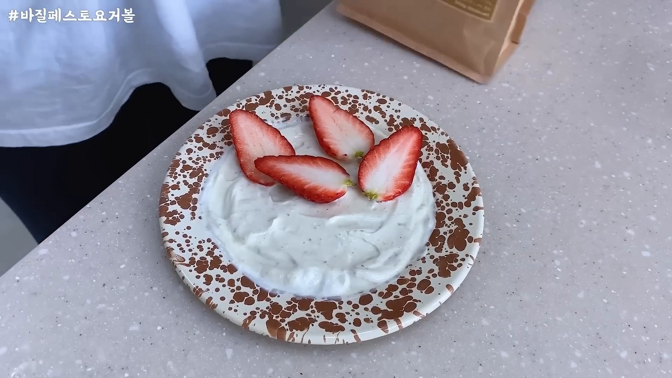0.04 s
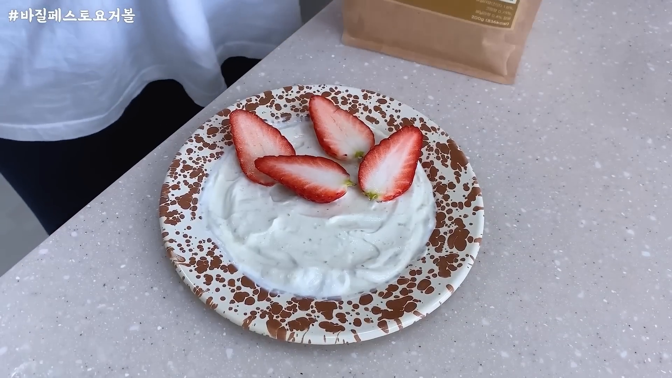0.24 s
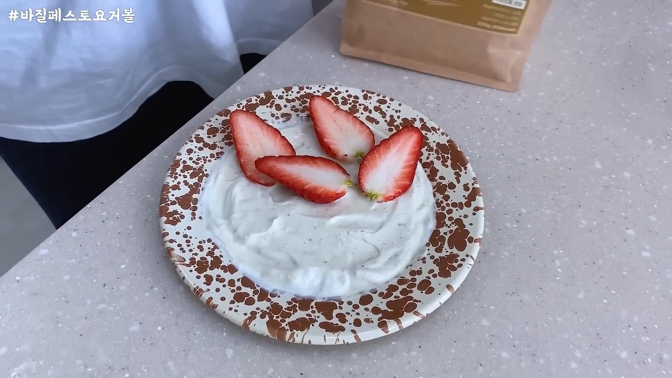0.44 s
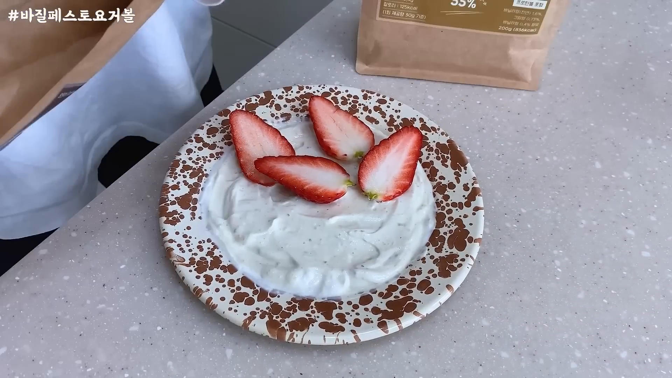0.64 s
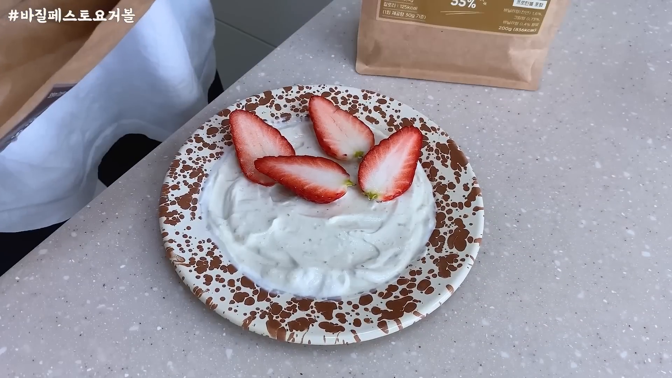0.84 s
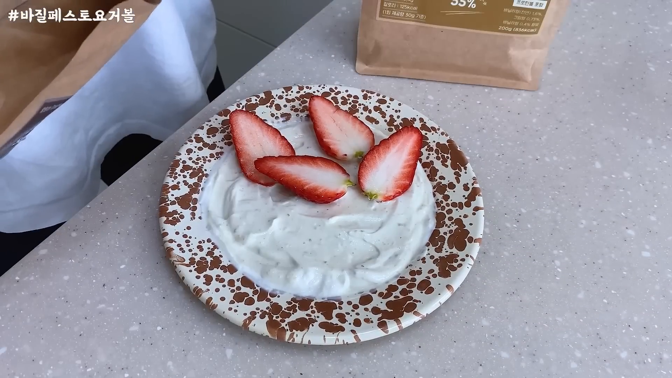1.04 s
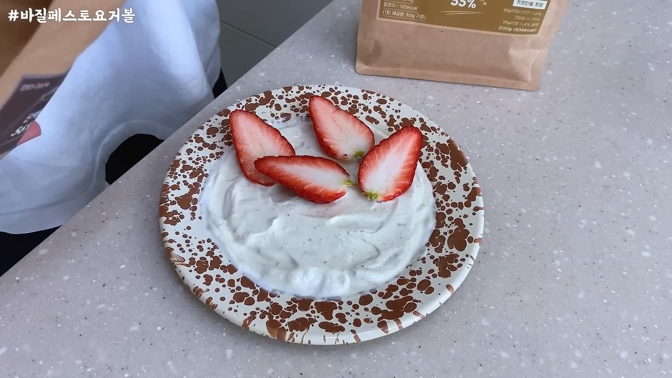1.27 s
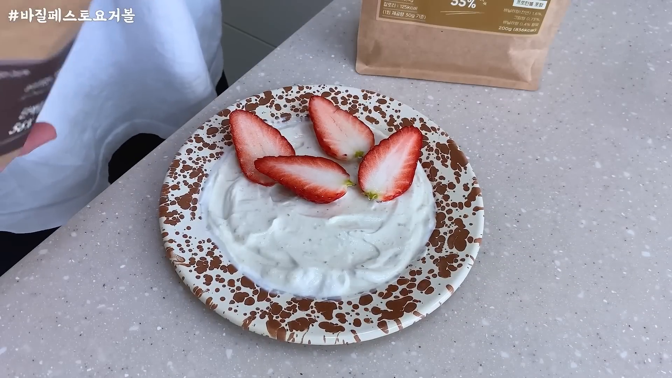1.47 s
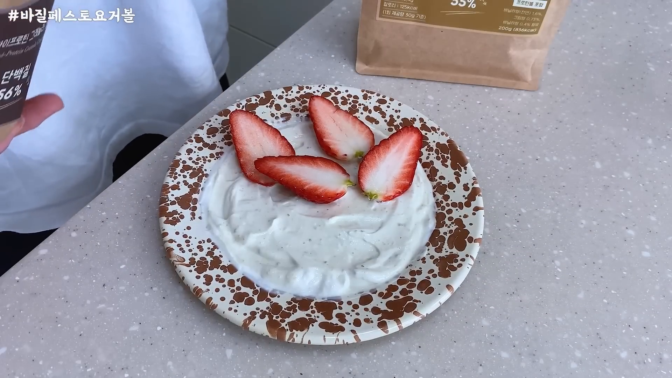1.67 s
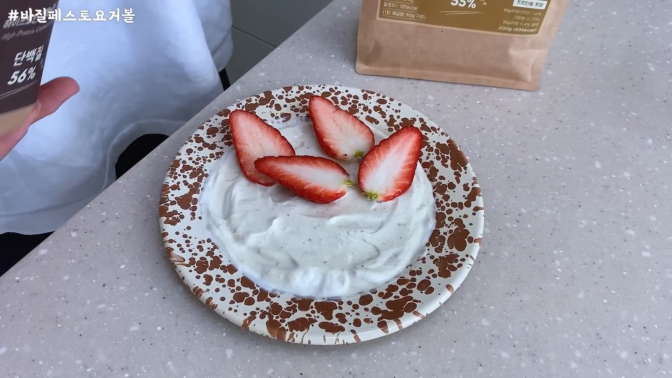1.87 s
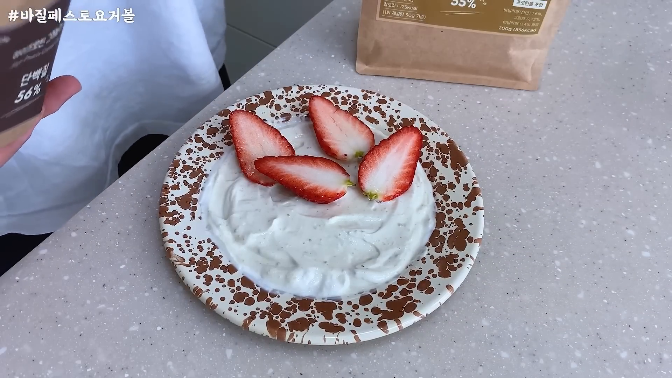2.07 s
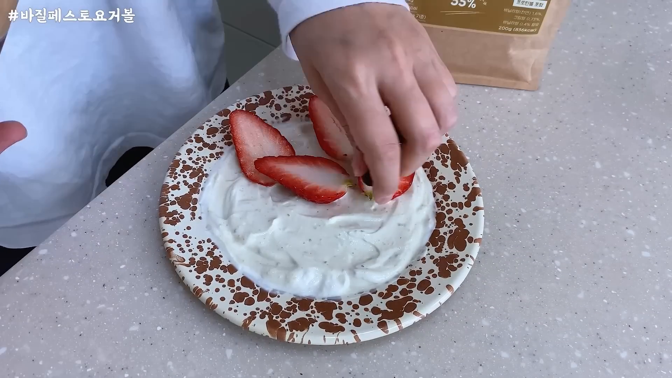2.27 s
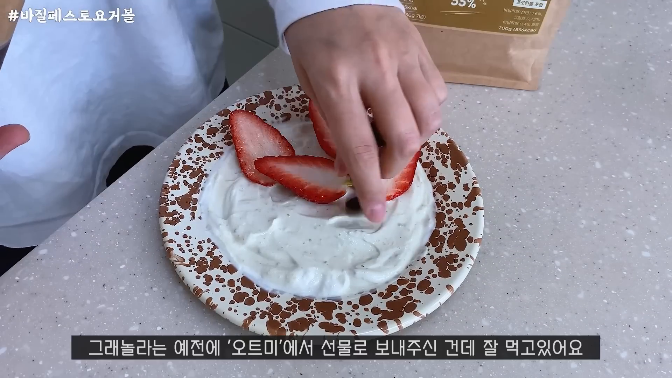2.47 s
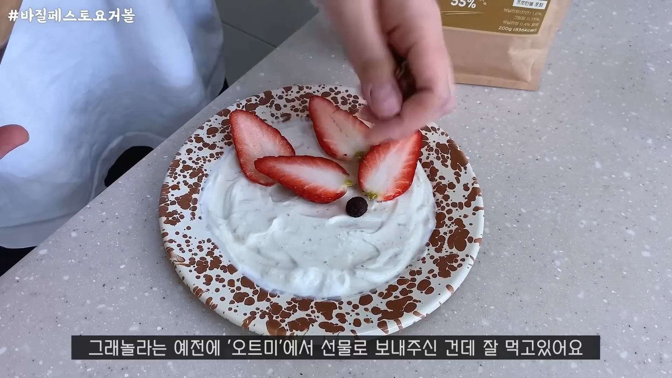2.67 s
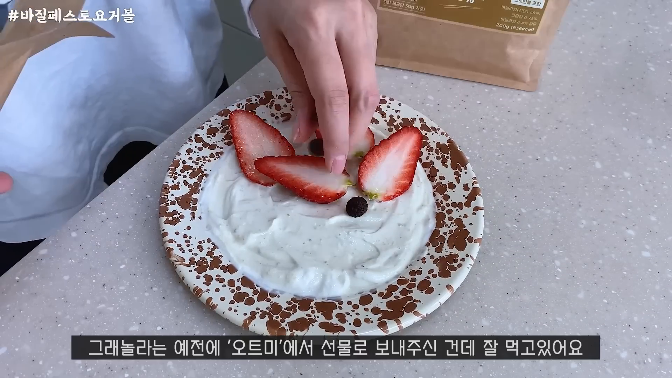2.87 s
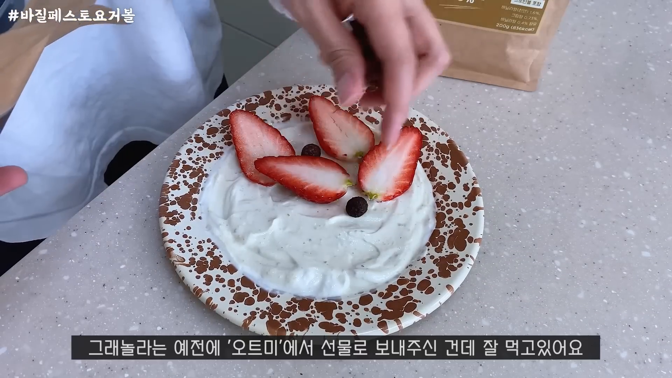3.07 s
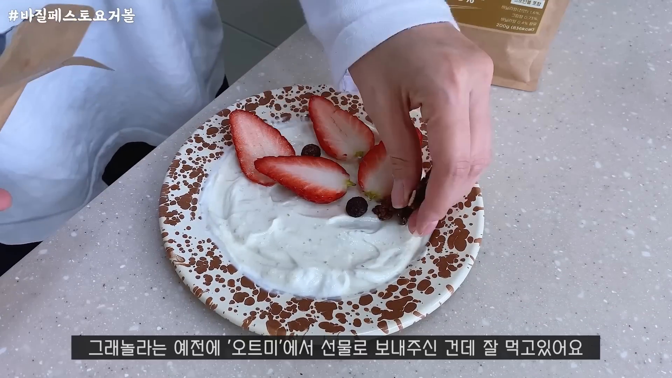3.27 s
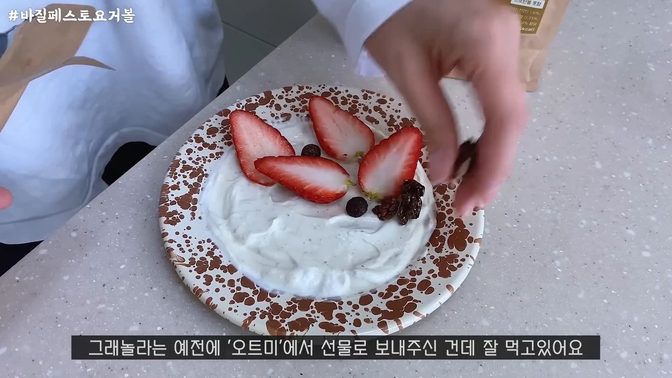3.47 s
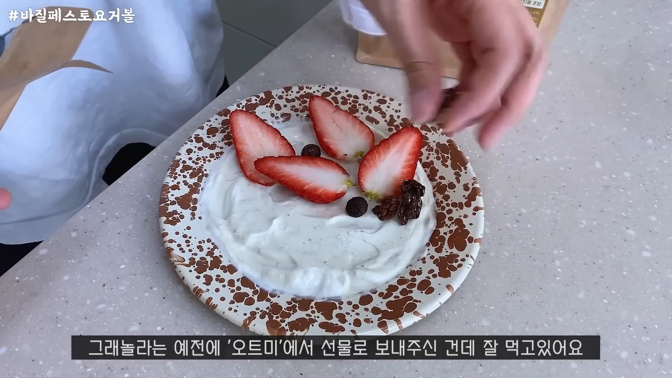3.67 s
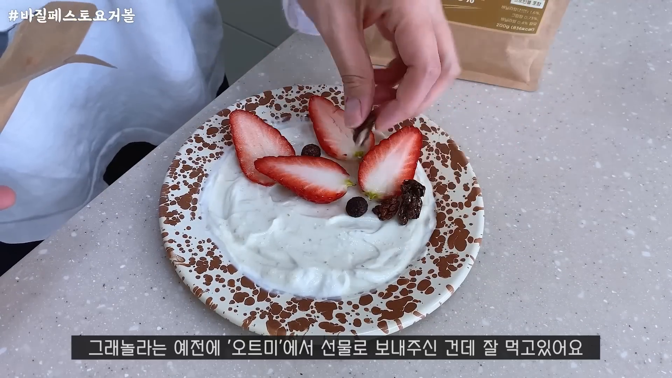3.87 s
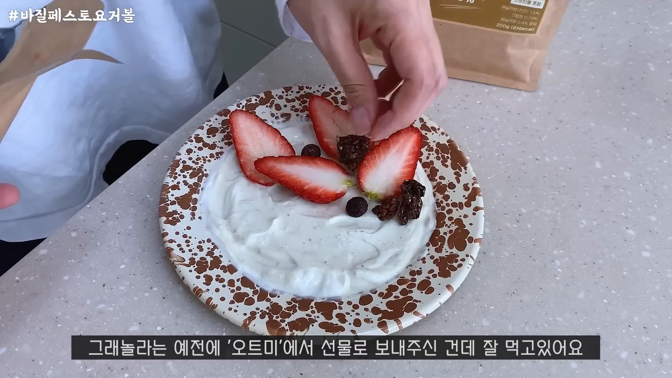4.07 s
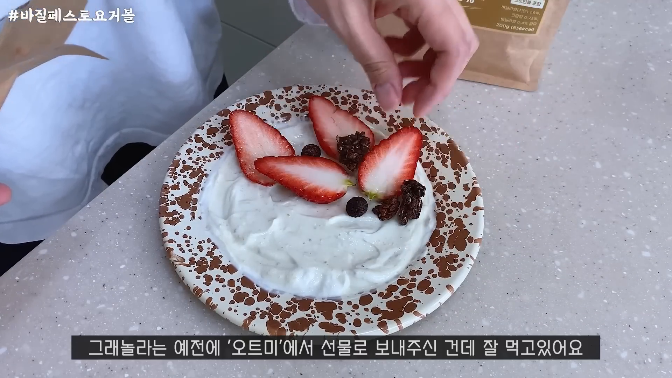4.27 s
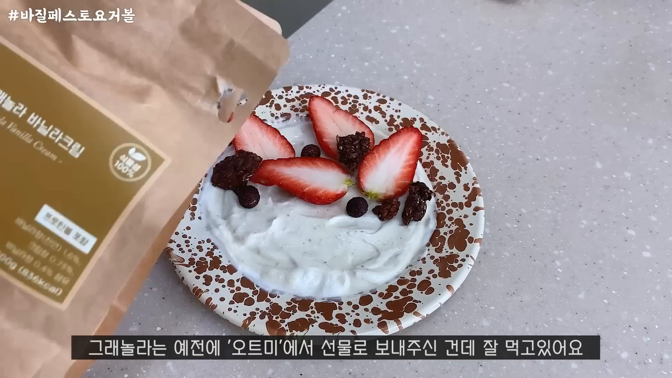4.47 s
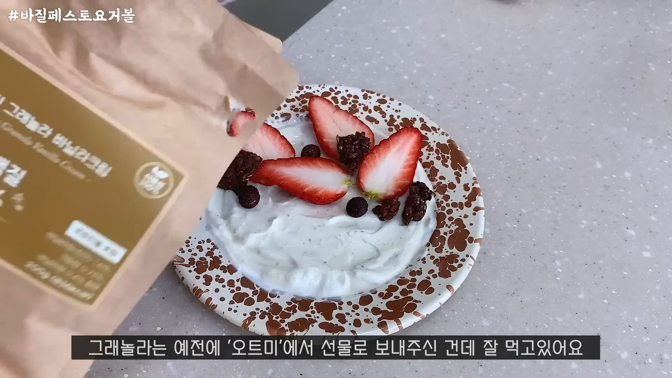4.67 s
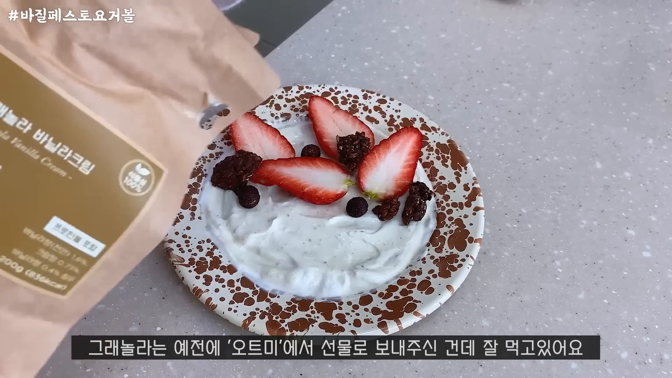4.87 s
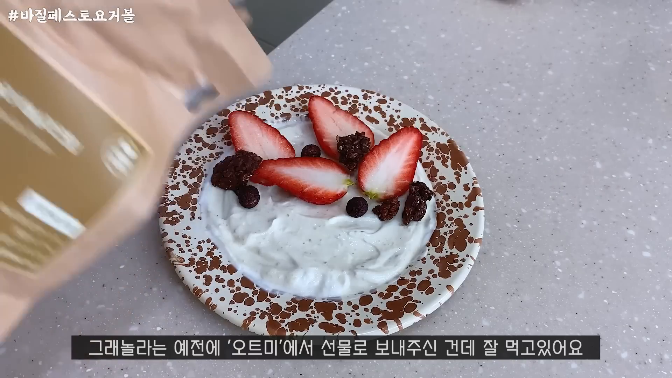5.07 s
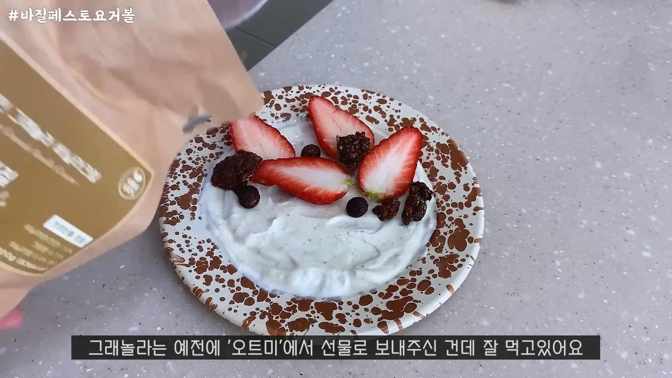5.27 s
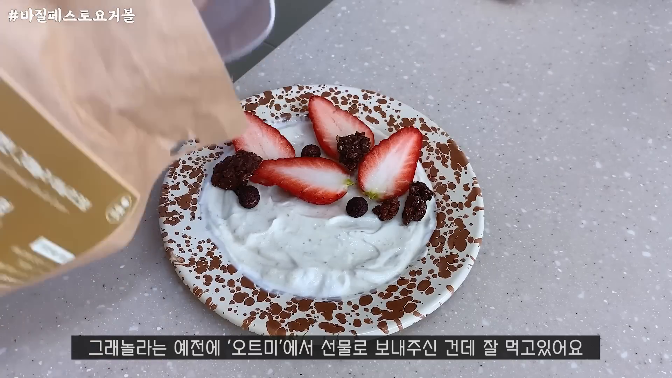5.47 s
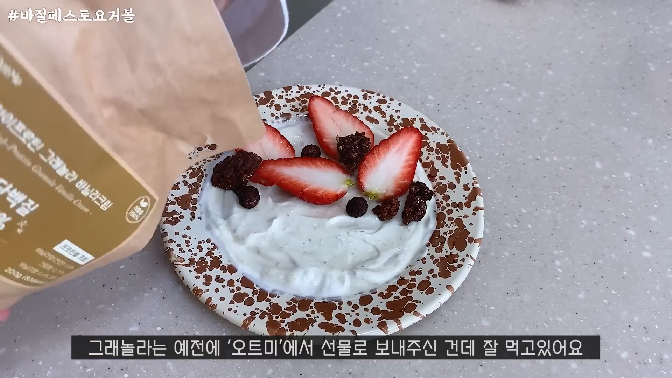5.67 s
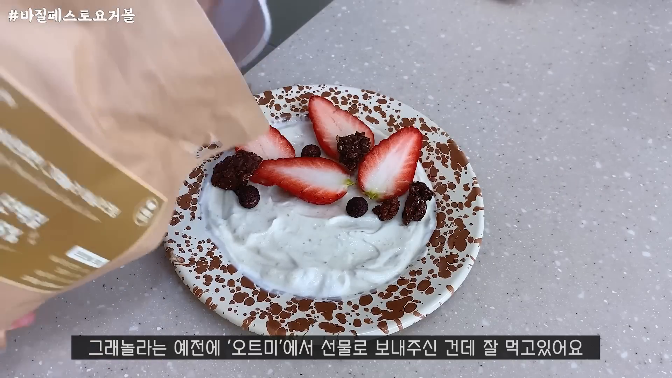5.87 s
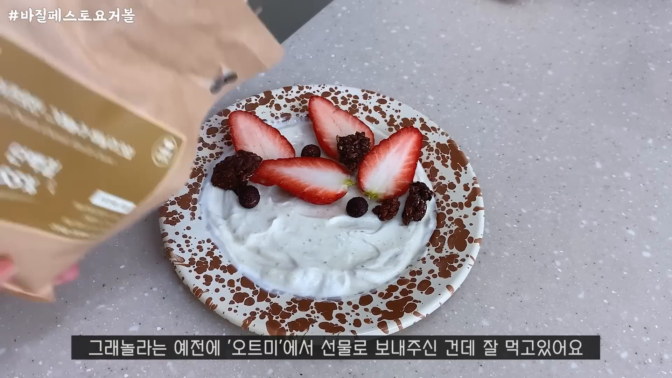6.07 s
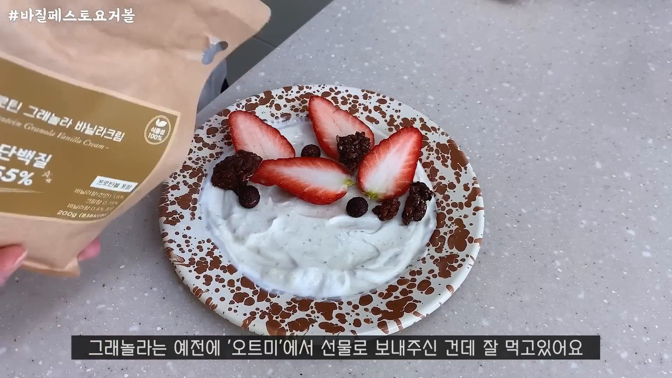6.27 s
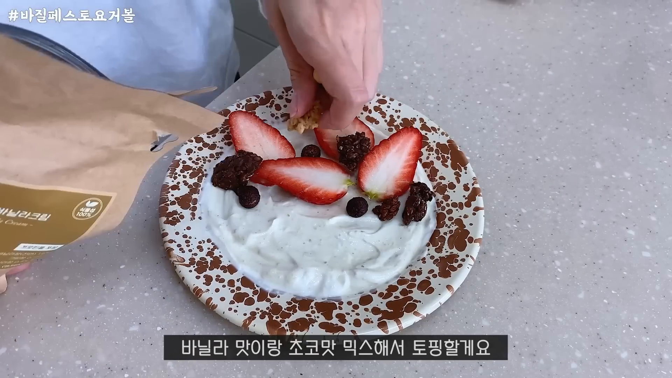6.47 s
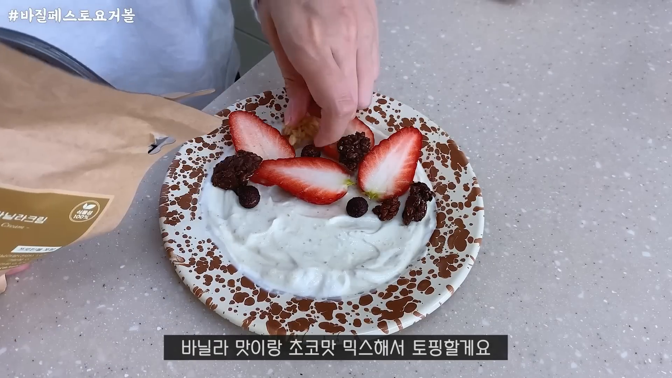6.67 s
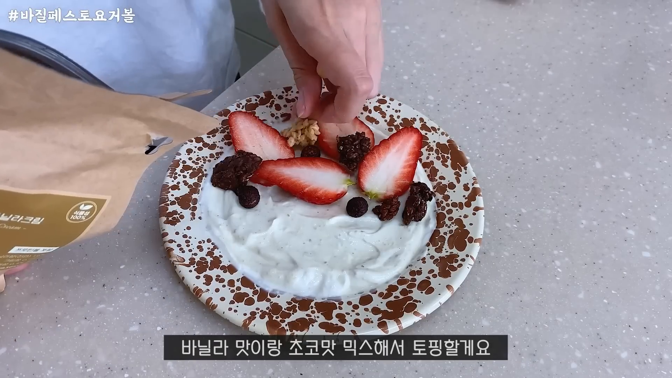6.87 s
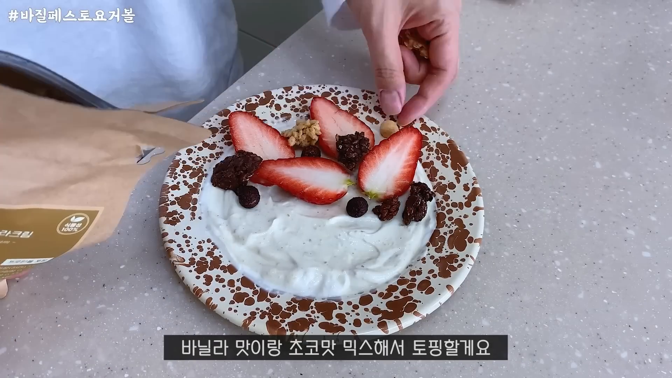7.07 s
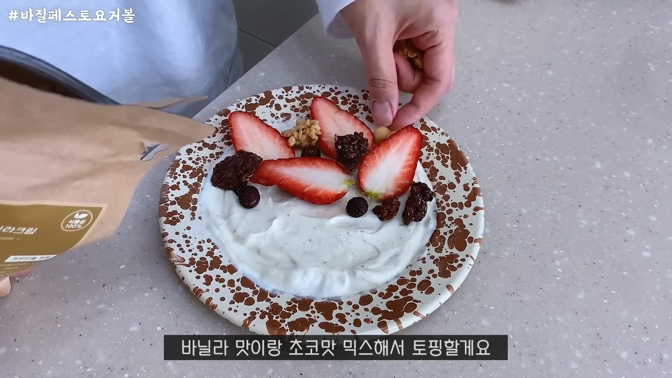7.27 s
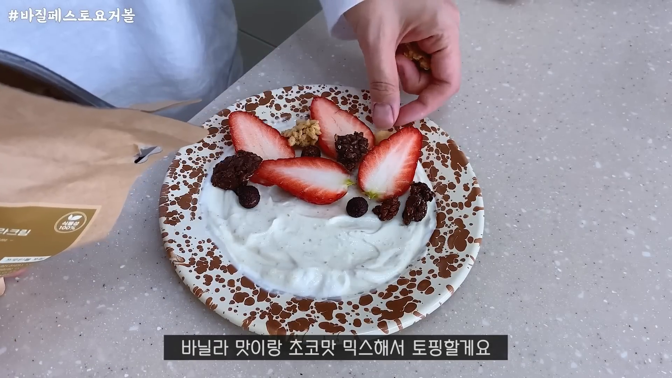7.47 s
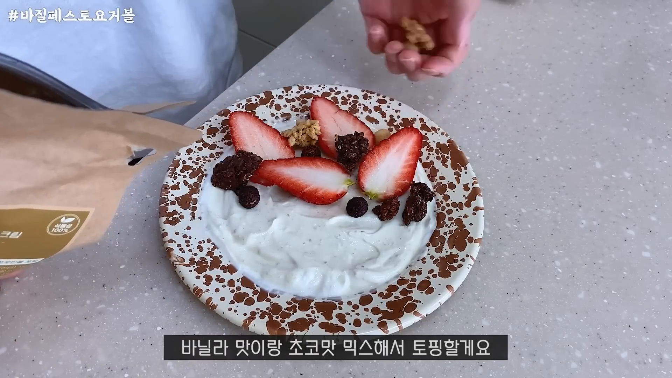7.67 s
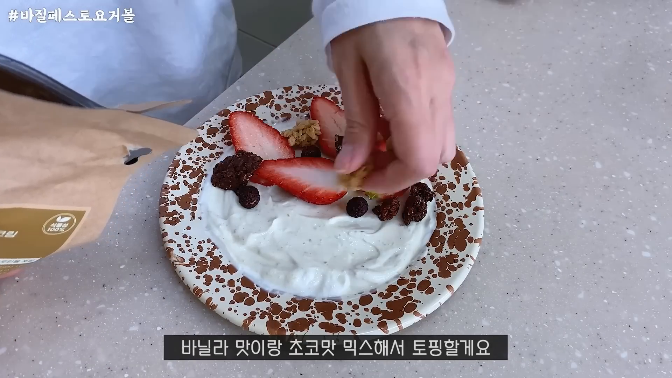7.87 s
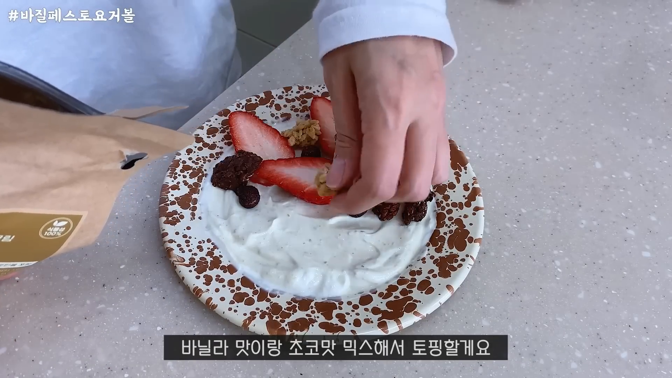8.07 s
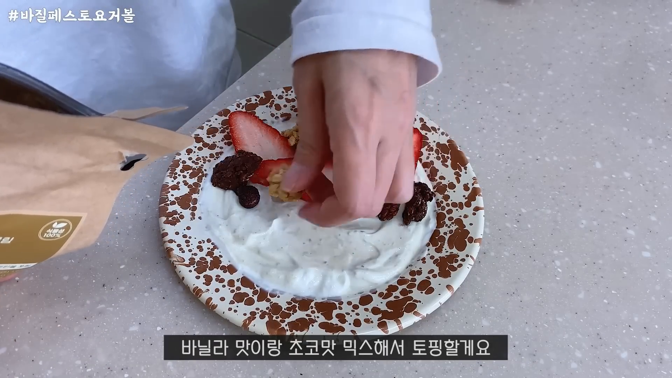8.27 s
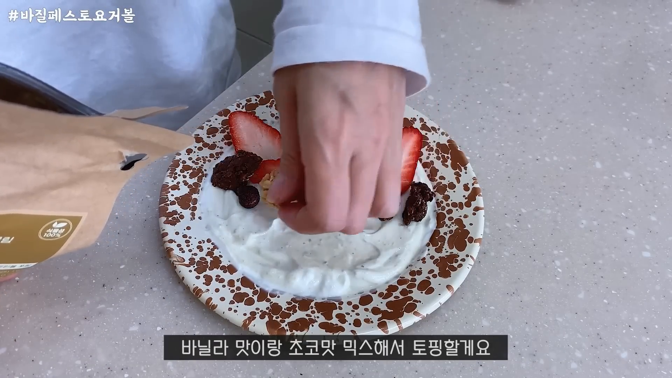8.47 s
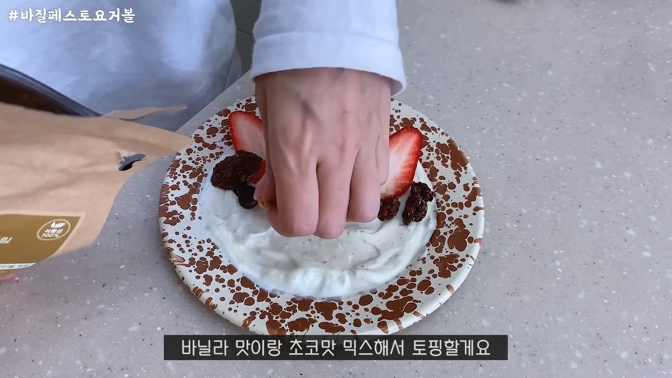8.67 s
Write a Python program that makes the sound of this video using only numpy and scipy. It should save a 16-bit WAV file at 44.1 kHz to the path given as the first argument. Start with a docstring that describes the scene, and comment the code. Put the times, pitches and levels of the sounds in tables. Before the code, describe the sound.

A stiff paper pouch crackles and rustles close up in two abrupt bursts, with faint topping ticks and low room rumble in between.

```python
"""A stiff paper pouch is handled close to the microphone in a kitchen, in two bursts that start and stop
abruptly. Its creases buckle as sharp chirped clicks with dying crackle, over a crumple built from many small
ringing grains. Filtered noise with fine grit makes the hiss of rubbing paper; low grains and falling tones are
its flapping walls, and a falling thump sets it down on the counter at the start. Between and after the bursts,
toppings tick faintly on a plate amid soft strokes of noise, low swishes to high wisps. Behind it all lies a low
room rumble with faint wavering tones."""
import sys
import numpy as np
from scipy import signal
from scipy.fft import rfft, irfft
from scipy.io import wavfile
from scipy.ndimage import uniform_filter1d

SR = 44100
rng = np.random.default_rng(int(sys.argv[2]) if len(sys.argv) > 2 else 0)


def pcm_store(signal):
    """Save signal as 16-bit PCM."""
    levels = np.round(np.clip(np.atleast_2d(signal), -1, 1) * 32767)
    wavfile.write(sys.argv[1], SR, levels.astype(np.int16).T)


N = 384993
TIME, HZ = np.arange(N) / SR, np.fft.rfftfreq(N, 1 / SR)

# when the pouch is in hand: (start [s], end [s])
HANDLED_SPANS = [(0, 2.305), (4.398, 6.402)]
# large creases that buckle: (time [s], level [dB], boom of the wall [dB], upper-mid bite [dB],
# brightness [dB], ring [Hz], ring height [dB], crackle decay [s])
LARGE_CREASES = [(0.0132, -21.5, 15, 1, 5.5, 549, 16, 0.011), (0.0229, -20, -2, -3, -7, 734, 9, 0.0062),
                 (.094, -33, 14, -1, 0.5, 1060, 11, 0.005), (.1865, -32.5, 6, -1, -13, 1540, 7.5, 0.00085),
                 (0.3357, -42, 10, -6, -3, 780, 12, 0.0028), (0.3865, -32, 26, 3, -1, 1270, 3, 0.0024),
                 (.4065, -30, 18.5, -4, -6, 696, 14, 0.0039), (0.436, -44, 2, -3, 4, 6500, 6, .0011),
                 (.518, -47.5, 12, 0, 15.5, 7000, 1, .001), (.539, -43, 24.5, -4, 8, 550, 6.5, .001),
                 (0.5753, -44.5, 4.5, 0, 11, 504, 7, 0.0008), (.609, -39, .5, 1.5, -13.5, 1598, 8, 0.0062),
                 (.62, -37, 4.5, 3, -11.5, 899, 4.5, 0.0068),
                 (0.6472, -40.5, 0.5, -3, -16, 675, 11, 0.0018),
                 (.685, -50.5, 6, -2.5, 11, 600, 10, 0.00057), (.7114, -36, 1, -2, -14.5, 920, 7, 0.01),
                 (.729, -33, 10.5, -3, -22, 602, 14, 0.0057), (.741, -29, 12.5, -8, -24, 474, 8.5, .0013),
                 (0.7975, -41.5, 8, -3, -6.5, 520, 7, 0.0042), (.818, -39, 18, -3.5, -10, 1300, 7.5, .002),
                 (0.8544, -32, -2, -2, -18, 960, 8, 0.0038), (0.9172, -16, -14, 3, -4.5, 1323, 5.5, 0.0015),
                 (.9265, -32.5, 4.5, 2, -2.5, 706, 6, 0.0021),
                 (.991, -45.5, 0, 3.5, 11.5, 1300, 6, 0.00086), (1.011, -32, 25, 7, 0, 527, 11, .00036),
                 (1.0331, -29, 6, 10.5, 2, 780, 12.5, 0.00061), (1.103, -39, 9, 14, -3, 1290, 14, .0024),
                 (1.128, -40, -4, 13, 7, 646, 20, 0.0012), (1.1336, -38, 5, 0, -1, 1894, 18, 0.0055),
                 (1.149, -40, 19, -5, -8, 1000, 10, 0.0013), (1.166, -41, 0, 6, 5, 2680, 7, 0.0032),
                 (1.1866, -45.5, 4, 7, 15, 730, 7, .001), (1.1983, -34.5, 11, -11, -4, 533, -6, 0.0014),
                 (1.208, -39.5, 12, 6, 4, 1420, 5, .0015), (1.277, -43, 0, -1, -10, 850, 13, 0.002),
                 (1.465, -35.5, 3.5, 8, -10.5, 1518, 8.5, 0.0033),
                 (1.4752, -31, -2, 10.5, -4, 830, 4, 0.00068), (1.599, -44, 5, -2, 2.5, 1143, 8.5, 0.0055),
                 (1.615, -46, 4, -5, -8.5, 1400, 10.5, 0.0038),
                 (1.644, -36.5, 9.5, 0, -5.5, 1150, 6, 0.0064),
                 (1.693, -40, 5.5, -2, -5, 1430, 18.5, 0.0021),
                 (1.7296, -38.5, 12.5, -6, -6.5, 1350, 15.5, 0.0046),
                 (1.7568, -35, 8, 4, -5, 602, 5.5, 0.0055), (1.7855, -22.5, 6.5, 8.5, 7, 1450, 7, 0.0029),
                 (1.8086, -34.5, 14.5, -2, 3, 526, 8.5, 0.0067), (1.992, -42, 26, -5, -10, 430, 7, .005),
                 (2.0332, -43, 2, -1, -6, 1150, 12, 0.0029), (2.079, -47.5, -9, 15, 6, 1140, 18, 0.00053),
                 (2.1506, -33.5, 11, -5.5, -9, 590, 13, 0.0067),
                 (2.205, -47.5, 10, -9, -10.5, 1300, 12.5, .002), (2.2358, -53.5, 20, 4, 10, 502, 9, .001),
                 (2.2615, -53, -7, 4, -7, 630, 12, 0.0022), (2.279, -54.5, 0, -8, -9, 1200, 0, 0.0027),
                 (4.3983, -42, 10, 1.5, 3, 498, -5, .011), (4.4263, -34.5, 14, -7, 0, 3700, 15, 0.013),
                 (4.436, -27.5, 7, 5, -2, 2010, 5, 0.0043), (4.4787, -29, 5, 4, -5, 370, 8.5, 0.0052),
                 (4.636, -54, 17, 1, -13, 900, 11, 0.0021), (4.695, -47.5, -4, 4, -6, 950, 7, 0.0058),
                 (4.743, -50.5, -16, 1, -11, 820, 3, .002),
                 (4.8687, -27, 16.5, 5.5, 3.5, 1330, 6.5, 0.0032),
                 (5.0347, -40, -13.5, 0.5, -4.5, 732, 10, 0.0013),
                 (5.055, -48, 12.5, 2, -4, 480, 3.5, 0.0023),
                 (5.0651, -39.5, 0.5, 9, 9.5, 700, 8.5, 0.0019),
                 (5.095, -33, -10, -5, -11.5, 1230, 10, 0.0036),
                 (5.1287, -26, -5, 14, 8.5, 1230, 14, .0021), (5.1631, -38, 4.5, 5.5, -21, 520, 1, 0.0025),
                 (5.1883, -24, -20, -8, -4.5, 1426, 7, 0.00054),
                 (5.261, -28.5, -36, -1.5, 1, 1180, 14.5, 0.0055),
                 (5.2756, -36, -21, 4, -14, 1280, 17, 0.0013), (5.2986, -34, -10, 1, -6, 905, 10, .0008),
                 (5.339, -30, -6, 0, 0, 1400, 9, 0.0037), (5.413, -34, 12, -3, 4, 840, -1, 0.0012),
                 (5.476, -33, 4, -6, -0.5, 705, 4, 0.0026), (5.5004, -32.5, 6, -11, -7, 851, 3.5, 0.0012),
                 (5.515, -33, 10, -21, -9, 807, 1, .002), (5.594, -36, 15, -2, -4, 560, 7, 0.0037),
                 (5.637, -31.5, 17, -4, -16, 500, 0, 0.0068), (5.6647, -38, 6, -1, -13, 613, 7, .005),
                 (5.691, -29.5, 3, -12, -10, 1057, 9, 0.0056), (5.7202, -43, 11, 3, -14, 670, 4, 0.0021),
                 (5.7376, -40, 0, 3, 20, 650, 7, 0.00049), (5.755, -37, 2, 5, -15, 700, 1, 0.0027),
                 (5.798, -37.5, -11, -9, -9, 503, 3, .00086), (5.9165, -42, -11, -5, -17, 744, 17, 0.0025),
                 (5.966, -45.5, 0, 0, 20, 7250, 7, .00082), (5.994, -42, 5, 9, 5, 600, 10, .001),
                 (6.019, -38, 0, 0, -18, 1170, 22, 0.003), (6.036, -38, -7, 10, -6, 1400, 12, 0.006),
                 (6.0621, -36, 19, -8, 2, 790, 9, 0.0028), (6.0841, -32, 0, -14, -7.5, 900, 5, 0.0022),
                 (6.167, -42, 7, -8, 4, 1400, 6, 0.0013), (6.231, -36, 11, 4.5, -8, 496, 7, 0.0028),
                 (6.396, -46.5, -1, 4, -2, 1195, 10, 0.00061)]
# resonances and a hollow of the whole pouch: (frequency [Hz], height [dB], log-frequency width [1])
POUCH_RESONANCES = [(1340, 2, 0.061), (2580, 3, 0.057), (3080, 2.5, 0.043), (3975, -3, 0.019),
                    (6500, 3, .05)]
# colour of a buckling crease: (frequency [Hz], relative density [dB/Hz])
CREASE_SPECTRUM = [(30, -37.5), (60, -20.5), (120, -11.5), (210, 2.5), (400, 6.5), (700, 3), (1300, 1),
                   (2050, -3), (2700, -6), (4500, -8), (8000, -12.5), (10000, -24), (14000, -26),
                   (16000, -32.5)]
# the pouch is set down on the counter, then whole walls flip over: (time [s], level [dB], end pitch [Hz], decay
# [s])
POUCH_THUMPS = [(0.021, -26.5, 71.5, .016), (.403, -32.5, 82.6, 0.015), (.75, -43, 95, .012),
                (0.939, -41, 85, .014), (1.021, -32, 101, .014), (1.15, -35, 80, 0.011),
                (1.81, -41, 89, 0.013), (2.124, -40, 96, 0.016), (4.4, -34, 97, 0.011),
                (4.433, -29, 103, .0081), (4.486, -23, 82, 0.013), (4.873, -30, 151, 0.0058),
                (5.135, -40, 81, .02), (5.315, -37, 84.4, 0.025), (5.47, -34.5, 80, .018),
                (6.06, -49, 110, 0.017)]
# rising and falling rustle of the handled pouch, beneath the squeezes, one list per burst,
# before the trims in handling(): (time [s], crumpling [dB], rubbing [dB], wall flapping [dB])
RUSTLE_LEVELS = [
    [(0.0, -52, -58, -52), (0.16, -61, -67, -59), (0.37, -42.5, -48.5, -52), (0.47, -44.5, -48, -50.5),
     (0.81, -45, -56.5, -50.5), (1.03, -47.5, -57.5, -47), (1.17, -54.5, -66, -55), (1.42, -55, -60.5, -59),
     (1.55, -52.5, -57.5, -57), (1.82, -53.5, -61, -52.5), (1.93, -60.5, -60, -59.5),
     (2.02, -46.5, -55.5, -51.5), (2.14, -71, -69, -48.5), (2.22, -55, -73, -56), (2.29, -58, -72, -71)],
    [(4.41, -64, -62, -51), (4.454, -49, -54, -52), (4.61, -55, -64.5, -74), (4.78, -46.5, -51, -75),
     (4.95, -48, -54.5, -69), (5.148, -43, -50, -70.5), (5.292, -39, -47.5, -48.5),
     (5.584, -38, -49.5, -55), (5.76, -47.5, -67.5, -73), (6.086, -40, -51, -48.5),
     (6.234, -54, -57.5, -80), (6.39, -57, -68, -53)],
]
# squeezes of the fingers: (peak time [s], level before the crumple trim [dB], length [s],
# rubbing relative to level [dB], crackling relative to level [dB])
FINGER_SQUEEZES = [(0.031, -31.5, 0.15, -8, -12), (0.179, -38, 0.09, -13.5, -30),
                   (.351, -38.5, 0.12, -7.5, -27), (0.625, -36.5, 0.064, -31, -8.5),
                   (.727, -41, 0.089, -11.5, -8), (0.858, -35.5, 0.037, -15, -8),
                   (.935, -42, 0.065, -11, -7), (.985, -44, 0.023, -8, -7),
                   (1.038, -31.5, 0.015, -10.5, -19), (1.147, -34, 0.053, -17, -15),
                   (1.201, -31, 0.037, -17, -11.5), (1.279, -38, 0.04, -19.5, -26),
                   (1.404, -43.5, 0.088, -9.5, -20), (1.798, -38.5, 0.12, -11, -15),
                   (1.863, -41.5, 0.019, -28, -9), (2.07, -48, 0.098, -4.5, -11.5),
                   (2.135, -43.5, 0.043, -26, -23), (4.881, -37.5, 0.044, -19.5, -3.5),
                   (5.061, -38.5, 0.037, -9, -14), (5.142, -30.5, 0.045, -6, -2),
                   (5.182, -35, 0.08, -4, -9), (5.328, -29.5, 0.038, -3, -19.5),
                   (5.505, -49, 0.026, -23, -22), (5.648, -43.5, 0.034, -7, -13),
                   (5.693, -36, 0.12, -12.5, -5), (5.75, -34.5, 0.08, -9.5, -6.5),
                   (5.926, -39, 0.069, -9, -5.5), (5.98, -41, .04, -8, -3),
                   (6.038, -37.5, 0.027, -12, -8.5), (6.085, -41, 0.059, -18, -3),
                   (6.161, -37.5, 0.093, -9, -1.5), (6.353, -44.5, 0.098, -12.5, -8)]
# colour of the dense crumple: (frequency [Hz], relative density [dB/Hz])
CRUMPLE_SPECTRUM = [(90, -27), (170, -17), (300, 7), (550, 6.5), (800, 5.5), (1000, 2.5), (1350, 0),
                    (1700, -5), (2150, -8.5), (2600, -15.5), (3500, -20.5), (5500, -33), (9000, -36.5),
                    (16000, -51)]
# colour of tiny cracks in the coating: (frequency [Hz], relative density [dB/Hz])
CRACKLE_SPECTRUM = [(800, -6), (1400, 7), (2100, 1.5), (2600, -1.5), (3500, -3), (4500, -16.5), (8000, -18)]
# colour of rubbing paper: (frequency [Hz], relative density [dB/Hz])
RUB_SPECTRUM = [(1000, -11.5), (2500, 5), (4000, 2.5), (5700, 2), (7500, 2), (8700, -5.5), (9800, -7.5),
                (12000, -4.5), (14000, -7.5), (15600, -19.5), (16500, -32)]
# colour of the flapping walls: (frequency [Hz], relative density [dB/Hz])
FLAP_SPECTRUM = [(20, -39), (45, -10.5), (80, -4.5), (130, -1), (200, 5.5), (280, -2), (450, -25.5),
                 (2000, -65)]
# fingers slide along the paper: (time [s], level [dB], 1/e half-length [s], centre [Hz], log-frequency width [1])
FINGER_SLIDES = [(.39, -63, 0.069, 5900, .35), (.53, -50.5, 0.052, 11100, .4),
                 (1.603, -57, .008, 12570, .25), (4.81, -61, 0.019, 12000, .25),
                 (5.06, -71, 0.018, 12000, .25), (6.165, -55, 0.029, 9000, .6)]
# where the pouch is held: (time [s], left minus right [dB])
POUCH_POSITION = [(0, -2), (.3, -1), (.52, -2.5), (.65, 4), (.95, 4), (1.3, 3.5), (2.3, 3.5), (4.4, 2.5),
                  (5.2, 5.5), (5.7, 2.5), (6.4, 2)]
# fixed balance of the pouch's treble: (frequency [Hz], left minus right [dB])
POUCH_TREBLE_BALANCE = [(2500, -2), (4500, -3.5), (7000, -0.5)]
# likeness of the two microphone ports: (frequency [Hz], coherence [1])
PORT_COHERENCE = [(50, .88), (400, .68), (1300, .72), (2500, .55), (5500, .45), (7500, .72), (8700, .96),
                  (9500, .97), (10600, .55), (11800, .96), (12800, .96), (13800, .6), (15200, .97)]
# phase by which the left port leads: (frequency [Hz], lead [rad])
PORT_LEAD = [(50, 0), (1400, .5), (3000, 1.1), (4200, -.1), (5400, -.7), (6900, 0), (8200, 2.3),
             (9200, 3.14), (10800, 5.7), (12300, 6.28), (13300, 6.6), (14600, 9), (16000, 9.6)]
# toppings touch each other and the plate: (time [s], level [dB], brightness [dB], ring [Hz], crackle decay [s])
TOPPING_TICKS = [(2.388, -75, -12, 1393, 0.0021), (2.536, -72, 2, 2510, .0006),
                 (2.808, -66.5, 11, 2016, 0.0073), (2.8195, -58.5, -6, 696, 0.0059),
                 (2.829, -63.5, 4, 892, 0.0025), (3.2138, -63, 5, 2240, 0.0012),
                 (3.2643, -69, 4, 2210, .0006), (3.273, -63, 14, 3060, 0.0012),
                 (3.282, -69, 11, 3000, 0.0027), (3.7664, -71, -12.5, 895, 0.0019),
                 (6.6524, -74, 26.5, 3974, 0.00097), (6.7205, -69.5, -6, 3190, 0.00098),
                 (7.291, -71, -3, 3485, .002), (7.2975, -61, -6, 2100, 0.0023),
                 (7.304, -67, -12, 995, 0.0016), (7.632, -74, -10, 1205, 0.0021),
                 (7.931, -76.5, 16, 4000, 0.0023), (7.946, -73.5, -3, 2400, 0.0021),
                 (7.9498, -67, 21, 3960, 0.0026), (8.1956, -79.5, 11, 5480, .002),
                 (8.397, -77, 20, 3970, 0.0043), (8.4971, -66, 29, 3990, 0.00057)]
# a piece knocks on the plate: (time [s], level [dB])
PLATE_KNOCKS = [(7.2936, -57)]
# ringing modes of the plate: (frequency [Hz], level [dB], t60 [s])
PLATE_RINGS = [(1790, -4, 0.046), (2030, 0, 0.052), (2340, -7, 0.038), (2670, -9, .03), (3360, -13, .05),
               (3550, -8, 0.047), (4700, -15, .04)]
# soft strokes of noise, from low swishes to faint wisps of high hiss:
# (time [s], level [dB], 1/e half-length [s], centre [Hz], log-frequency width [1])
SOFT_STROKES = [(2.657, -82, 0.031, 3470, 0.15), (2.72, -61.5, 0.066, 228.7, 0.29),
                (2.75, -83, .07, 12400, 0.24), (2.803, -75.5, 0.027, 7000, 1),
                (2.825, -61, .0065, 750, 0.58), (2.933, -58.5, 0.013, 536, 0.63),
                (3.24, -62.5, 0.036, 250, 0.53), (3.655, -83, 0.055, 12450, .21),
                (3.771, -77.5, 0.029, 750, .55), (3.93, -83, .035, 12440, 0.21),
                (3.97, -89, .13, 1600, 0.73), (4.03, -58.5, 0.048, 280, .55),
                (7.005, -80, 0.035, 3130, .35), (7.076, -76.5, .037, 1990, .68),
                (7.47, -57.5, 0.071, 272.3, 0.65), (7.57, -83, .08, 1500, 0.65),
                (7.67, -85.5, 0.059, 12500, 0.22), (8.15, -86.5, .05, 12020, .4),
                (8.331, -76.5, .098, 855, .76), (8.61, -68.5, 0.04, 603, .55)]
# decay of the kitchen's reflections: (frequency [Hz], t60 [s])
KITCHEN_DECAY = [(100, 0.26), (500, 0.24), (2000, 0.29), (6000, 0.21), (15000, 0.047)]
# colour of the room rumble: (frequency [Hz], relative density [dB/Hz])
ROOM_SPECTRUM = [(20, -34.5), (35, -16.5), (50, 6), (75, -1), (120, -5), (165, -3.5), (210, 1), (270, -7.5),
                 (340, -4.5), (430, -16.5), (600, -15), (1000, -31), (3000, -40.5), (11000, -50.5),
                 (12500, -56), (16000, -59)]
# faint tones of an appliance: (frequency [Hz], level [dB])
APPLIANCE_TONES = [(205, -71), (346, -68.5)]

ONSET_S = .003  # lead-in before the crack of each buckle
# lesser creases: levels relative to the crumpling; spreads are the most either way
SMALL_PER_S, SMALL_DB, SMALL_SPREAD_DB, SMALL_BITE_DB = 10, -4.5, 2.5, 1
SMALL_BOOM_DB, SMALL_BRIGHT_DB, SMALL_BRIGHT_SPREAD_DB = 6.5, -4.5, 6.5
SMALL_RING_HZ, SMALL_DECAY_S = 1060, .0015
SQUEEZE_RISE, SQUEEZE_FALL = 0.4, 0.54  # 1/e times of the build-up and dying away, as shares of the length
SQUEEZE_CRUMPLE_DB, SQUEEZE_FLAP_DB = -1.5, -13  # relative to the level of the squeeze
ROOM_WAVER_DB, ROOM_WAVER_HZ = 1.3, 5  # rms swell of the low rumble, and the rate limit of its wander
EDGE_HZ = 15650  # upper band limit of the recorder


def snaps(turns=1.55, crackle=.35, gain_db=0):
    """The large creases of the pouch buckle, each coloured by the pouch's own resonances."""
    out = np.zeros((2, N))
    for s, db, boom_db, bite_db, bright_db, ring_hz, ring_db, decay in LARGE_CREASES:
        sound = snap(db + gain_db, boom_db, bite_db, bright_db, ring_hz, decay, turns, crackle,
                     ring_db, shell=body)
        add(out, s - ONSET_S, sound)
    return out


def snap(db, boom_db, bite_db, bright_db, ring_hz, decay, turns, crackle, ring_db=7.5,
         shell=np.ones_like, size=4096):
    """One buckle: a click and a dying flurry of tiny cracks; db is the rms over 10 ms."""
    t, hz = np.arange(size) / SR, np.fft.rfftfreq(size, 1 / SR)
    cracks = rfft(rng.standard_normal((2, size)) * np.exp(-t / max(decay, 1e-4)))
    # a long flurry buries the click, most of all in the treble
    share = crackle * (decay * (hz + 500)) ** 0.79
    click = [[1], [0]]  # the click is in the shared part only
    strike = ports(unit(cracks) * share + click, hz) / np.sqrt(1 + share ** 2)
    tilt = [(160, boom_db), (600, 0.0032), (1500, 0), (2900, bite_db), (5500, bright_db),
            (12000, 1.8 * bright_db)]
    colour_db = read(CREASE_SPECTRUM, hz) + read(tilt, hz)
    gain = amp(colour_db) * ring(hz, ring_hz, ring_db) * shell(hz)
    sheet = causal(gain) * bending(hz, turns)
    sound = irfft(strike * sheet * bounces(hz, strength=0.14))
    sound = np.roll(sound, round(ONSET_S * SR), axis=1)
    faded = sound * signal.windows.tukey(size, .04)
    return amp(db) * unit(faded) * np.sqrt(SR / 100 / size)


def body(hz):
    """The resonances of the pouch as a whole multiply its spectrum."""
    return np.prod([ring(hz, *mode) for mode in POUCH_RESONANCES], axis=0)


def ring(hz, centre_hz, height_db, width=0.16):
    """The broad resonance of one facet of the sheet, a bell on a log-frequency axis."""
    return amp(height_db * np.exp(-(np.log((hz + 1) / centre_hz) / width) ** 2))


def bending(hz, turns):
    """Bending waves in a sheet carry the treble first: a click turns into a short falling chirp."""
    return np.exp(-2j * np.pi * turns * np.log(hz + 20))


def bounces(hz, strength, count=3):
    """A few short echoes at random delays give every snap and tick a ragged colour of its own."""
    delay_s = rng.uniform(.0003, .0022, (count, 1))
    sign = rng.choice([-1, 1], (count, 1))
    echoes = (sign * np.exp(-2j * np.pi * hz * delay_s)).sum(0)
    return (1 + strength * echoes) / np.sqrt(1 + count * strength ** 2)


def small_snaps():
    """Lesser creases give way at random, louder the harder the paper is crumpled."""
    crumpling, out = handling()[0], np.zeros((2, N))
    for start, end in HANDLED_SPANS:
        for s in np.arange(start, end, 1 / SMALL_PER_S):
            late, size, bright, facet = rng.uniform(-1, 1, 4)
            s = max(s + late / SMALL_PER_S / 2, 0)
            db = 20 * np.log10(crumpling[int(s * SR)]) + SMALL_DB + SMALL_SPREAD_DB * size
            bright_db = SMALL_BRIGHT_DB + SMALL_BRIGHT_SPREAD_DB * bright
            ring_hz = SMALL_RING_HZ * 2 ** facet  # within an octave either way
            sound = snap(db, SMALL_BOOM_DB, SMALL_BITE_DB, bright_db, ring_hz, SMALL_DECAY_S,
                         turns=1.2, crackle=0.42, ring_db=10, shell=body)
            add(out, s, sound)
    return out


def thumps(glide=1.6, settle=0.0047, rise=0.0035):
    """The pouch lands on the counter, or a wall flips over, with a falling thump: the pitch sinks as it comes
    to rest."""
    t, out = np.arange(SR // 6) / SR, np.zeros((2, N))
    for s, db, end_hz, decay in POUCH_THUMPS:
        turns = np.cumsum(end_hz * (1 + glide * np.exp(-t / settle))) / SR
        envelope = (1 - np.exp(-t / rise)) * np.exp(-t / decay)
        add(out, s, amp(db) * np.sin(2 * np.pi * turns) * envelope * panned(0))
    return out


def rustle(clump_db=1.28, catch_db=-3):
    """Hands crumple, rub and flap the paper; the level wanders in clumps as the grip slips."""
    crumpling, rubbing, flapping, crackling = handling()
    crumple = crumpling * grains(CRUMPLE_SPECTRUM, per_s=1900, spread_db=0.5, sharpness=7.47, turns=1.1,
                                 patchy_db=0.0)
    cracks = crackling * grains(CRACKLE_SPECTRUM, per_s=640, spread_db=0.5, sharpness=8.3, turns=1.3,
                                patchy_db=0.5)
    # sliding fibres make a smooth hiss, with fine grit where they catch
    hiss = ports(rfft(rng.standard_normal((2, N))), HZ)
    slide = unit(irfft(hiss * amp(read(RUB_SPECTRUM, HZ)), N))
    grit = grains(RUB_SPECTRUM, per_s=8800, spread_db=2, sharpness=1.4, turns=.4, patchy_db=2.5)
    rub = unit(slide + amp(catch_db) * grit) * rubbing
    flap = flapping * grains(FLAP_SPECTRUM, per_s=1800, spread_db=0.5, sharpness=1.5, turns=1.5)
    return amp(clump_db * drift(36)) * (crumple + cracks + flap + rub)


def handling(crumple_db=-1, rub_db=1, flap_db=0, crackle_db=-11):
    """Strength of crumpling, rubbing, flapping and crackling: squeezes add to a rising and falling rustle."""
    s, crumpling, rubbing, flapping = np.vstack(RUSTLE_LEVELS).T
    t = TIME[::32]
    levels = crumpling + crumple_db, rubbing + rub_db, flapping + flap_db, crumpling + crackle_db
    power = np.array([amp(np.interp(t, s, level)) ** 2 for level in levels])
    for peak, db, length, rubbing_db, crackling_db in FINGER_SQUEEZES:
        u = (t - peak) / length
        swell = np.exp(-np.where(u < 0, (u / SQUEEZE_RISE) ** 2, u / SQUEEZE_FALL))
        shares_db = np.array([[SQUEEZE_CRUMPLE_DB], [rubbing_db], [SQUEEZE_FLAP_DB], [crackling_db]])
        power += (amp(db + shares_db) * swell) ** 2
    return [np.interp(TIME, t, np.sqrt(p)) for p in power]


def grains(spectrum, per_s, spread_db, sharpness, turns, patchy_db=0, count=48, size=2048):
    """Many small buckles of uneven size; each rings one facet of the paper for a few cycles."""
    hz, total = np.fft.rfftfreq(size, 1 / SR) + 1, np.zeros((2, N + size))
    # neighbouring facets give way together
    strain = rng.standard_normal((count, N // 128 + 1))
    strain = uniform_filter1d(strain, size=5, axis=0)
    strain = unit(uniform_filter1d(strain, size=6, axis=1))
    facets_hz = np.geomspace(spectrum[0][0], spectrum[-1][0], count)
    for facet_hz, load in zip(facets_hz, strain):
        facet = 1 / (1 + 1j * sharpness * (hz / facet_hz - facet_hz / hz))
        grain = irfft(facet * bending(hz, turns * rng.uniform(0.492, 1.5)))
        for channel, start, chance, sign in rng.random((int(per_s / count * N / SR), 4)):
            size_db = abs(spread_db) * min(-np.log(chance + 1e-9), 3.5)
            size_db += patchy_db * load[int(start * len(load))]
            place = total[int(2 * channel), int(start * N):][:size]
            place += amp(size_db) * np.sign(sign - .5) * grain
    pair = ports(rfft(total[:, :N]), HZ)
    return unit(irfft(pair * amp(read(spectrum, HZ)), N))


def brushes(strokes, height_db=20):
    """Soft strokes of noise, each in one resonance that swells and fades."""
    noise = ports(rfft(rng.standard_normal((2, N))), HZ) * amp(read(CREASE_SPECTRUM, HZ))
    out = np.zeros((2, N))
    for s, db, length, hz, width in strokes:
        band = ring(HZ, hz, height_db, width) - 1  # nothing passes far from the resonance
        stroke = np.exp(-((TIME - s) / length) ** 2)
        out += amp(db) * unit(irfft(noise * band, N)) * stroke
    return out


def placed(x):
    """Bass and middle follow the position of the pouch; the treble keeps one balance."""
    spectrum, halves = rfft(x), np.array([[.5], [-.5]])
    low = spectrum * np.clip(read([(1600, 0.87), (2500, 0.065)], HZ), 0, 1)
    high = (spectrum - low) * amp(read(POUCH_TREBLE_BALANCE, HZ) * halves)
    position_db = np.interp(TIME, *np.transpose(POUCH_POSITION))
    return irfft(low, N) * amp(position_db * halves) + irfft(high, N)


def ports(pair, hz):
    """Two unrelated spectra become the partly alike left and right of a microphone's port pair."""
    same = np.clip(read(PORT_COHERENCE, hz), 0, .995)
    mid = pair[0] * np.sqrt((1 + same) / 2)
    side = pair[1] * np.sqrt((1 - same) / 2)
    return np.array([mid + side, (mid - side) * np.exp(-1j * read(PORT_LEAD, hz))])


def toppings(boom_db=-12, bite_db=1, turns=0.299, crackle=0.65, ring_db=8):
    """Small dry pieces tick like tiny buckles with little boom."""
    out = np.zeros((2, N))
    for s, db, bright_db, ring_hz, decay in TOPPING_TICKS:
        sound = snap(db, boom_db, bite_db, bright_db, ring_hz, decay, turns, crackle, ring_db=ring_db)
        add(out, s - ONSET_S, sound)
    return out


def knocks():
    """A hard piece lands on the plate, whose modes ring briefly."""
    t, out = np.arange(SR // 6) / SR, np.zeros((2, N))
    plate = sum(amp(db - 60 * t / t60) * np.sin(2 * np.pi * hz * t) for hz, db, t60 in PLATE_RINGS)
    for s, db in PLATE_KNOCKS:
        add(out, s, amp(db) * plate * panned(0))
    return out


def kitchen(x, wet_db=-10, gap=0.0029):
    """Sparse reflections of the kitchen that start after a gap [s] and die faster in the top treble."""
    taps = rng.choice([-1., 1.], (2, SR // 2)) * (rng.random((2, SR // 2)) < 3000 / SR)
    taps[:, :int(gap * SR)] = 0
    hz, t, z = signal.stft(taps, SR, nperseg=256)
    colour_db = read([(1500, 3.5), (5000, -0.5), (12000, -12.5)], hz)[:, None]
    decay_db = -60 * t / read(KITCHEN_DECAY, hz)[:, None]
    tail = signal.istft(z * amp(colour_db + decay_db), SR, nperseg=256)[1]
    wet = signal.fftconvolve(x, tail / np.linalg.norm(tail[0]), axes=1)[:, :N]
    return x + amp(wet_db) * wet


def room_tone(db=-57.0, side_db=-10):
    """Low, gently wavering ventilation rumble, nearly mono in the bass, with a few faint tones."""
    mid, side = rfft(rng.standard_normal((2, N))) * amp(read(ROOM_SPECTRUM, HZ))
    side = side * amp(read([(60, side_db - 3.5), (200, side_db), (600, 1), (3000, -1.44)], HZ))
    hum = np.zeros(N)
    for hz, level_db in APPLIANCE_TONES:
        turns = np.cumsum(hz + 5 * drift(16)) / SR  # the pitch wanders by 5 Hz rms
        hum += amp(level_db) * np.sqrt(2) * np.cos(2 * np.pi * turns)
    pair, low = np.array([mid + side, mid - side]), 1 / (1 + (HZ / 800) ** 4)
    rumble = irfft(pair * low, N) * amp(ROOM_WAVER_DB * drift(ROOM_WAVER_HZ))
    air = rumble + irfft(pair * (1 - low), N)
    return (amp(db) * unit(air) + hum) * panned(0.92)


def amp(db):
    """Level in dB to amplitude."""
    return 10 ** (np.asarray(db) / 20)


def unit(x):
    """Scale to an rms of 1 over all channels together."""
    return x / np.sqrt(np.mean(abs(x) ** 2) + 1e-30)


def read(points, hz):
    """Read a table of (frequency, value) on a log-frequency axis."""
    f, value = np.transpose(points)
    return np.interp(np.log(hz + 1), np.log(f + 1), value)


def add(mix, s, sound):
    """Lay a sound into the mix from s seconds on."""
    part = mix[:, max(round(s * SR), 0):][:, :sound.shape[1]]
    part += sound[:, :part.shape[1]]


def panned(db):
    """Left and right gains for a level difference."""
    return amp(np.array([[db], [-db]]) / 2)


def drift(rate):
    """Slow random wander of rms 1, fading out above the rate [Hz]."""
    return unit(irfft(rfft(rng.standard_normal(N)) * np.exp(-(HZ / rate) ** 2), N))


def causal(gain):
    """The minimum-phase response with these gains, which rings only after it is struck."""
    both_sides = np.r_[gain, gain[-2:0:-1]]
    return np.exp(np.conj(signal.hilbert(np.log(both_sides + 1e-6))))[:len(gain)]


def scene():
    """The close pouch is heard only within its two bursts, over the plate and the room."""
    handled = sum((TIME >= start) & (TIME <= end) for start, end in HANDLED_SPANS)
    struck = kitchen(snaps() + thumps(), wet_db=-18.0)
    rustled = kitchen(rustle() + small_snaps() + brushes(FINGER_SLIDES), wet_db=-11.0)
    pouch = placed(struck + rustled) * uniform_filter1d(handled * 1., size=160)
    plate = kitchen(toppings() + knocks() + brushes(SOFT_STROKES), wet_db=-13)
    return pouch + plate + room_tone()


def record(dry):
    """The recorder's band limit, a steep low-pass."""
    lowpass = signal.firwin(511, EDGE_HZ, window=("kaiser", 9), fs=SR)
    return signal.oaconvolve(dry, lowpass[None], "same")


dry = scene()
out = record(dry)
pcm_store(out)
```